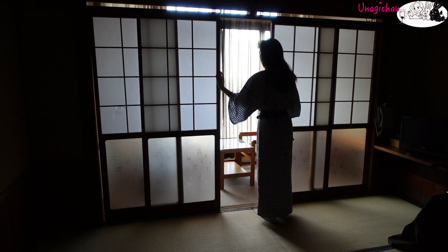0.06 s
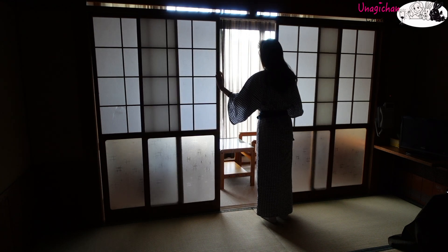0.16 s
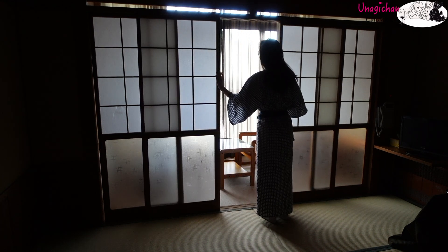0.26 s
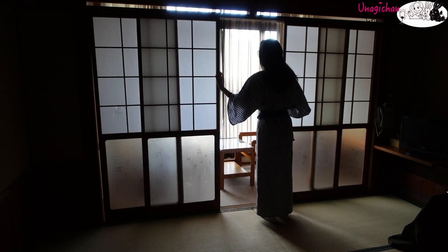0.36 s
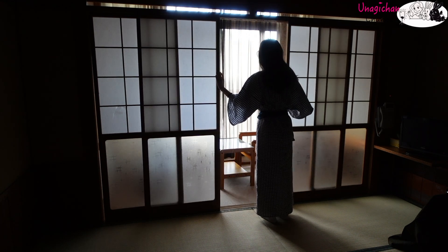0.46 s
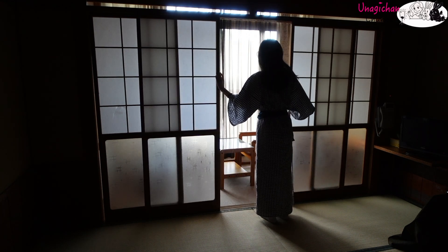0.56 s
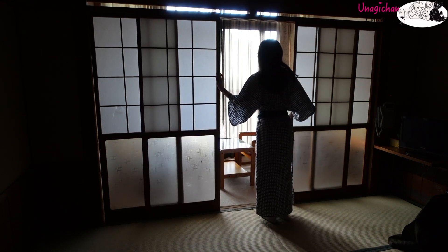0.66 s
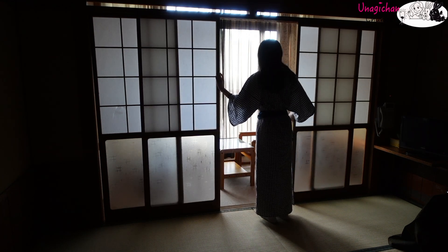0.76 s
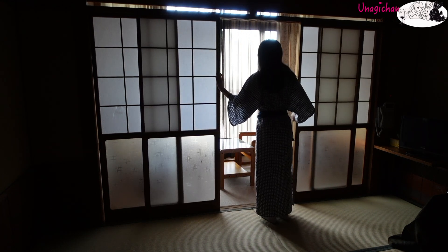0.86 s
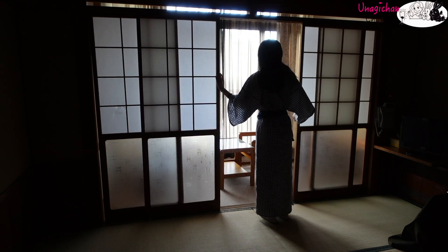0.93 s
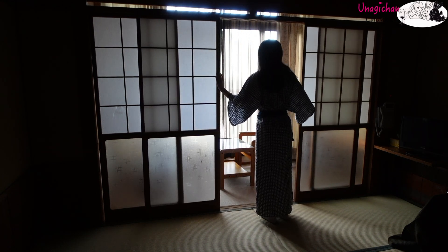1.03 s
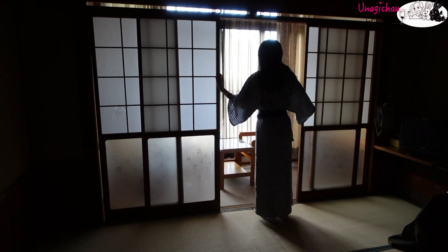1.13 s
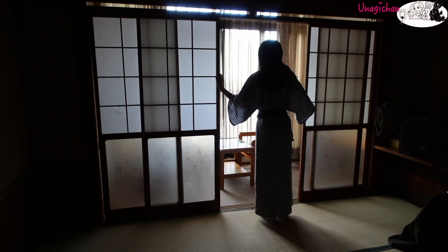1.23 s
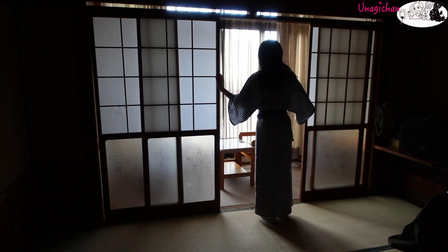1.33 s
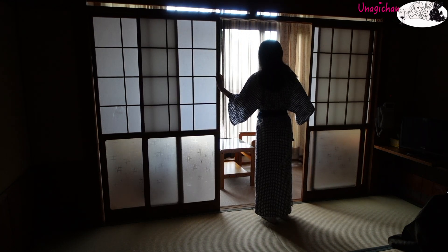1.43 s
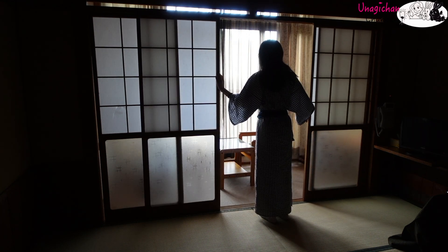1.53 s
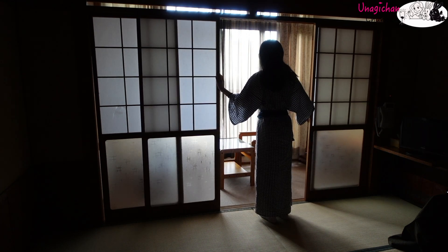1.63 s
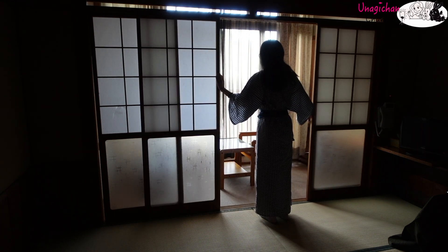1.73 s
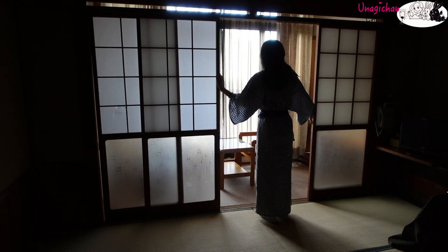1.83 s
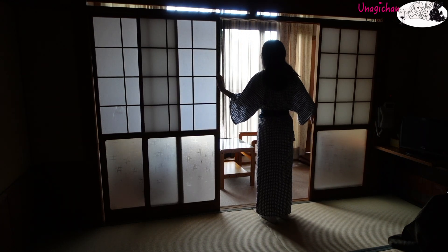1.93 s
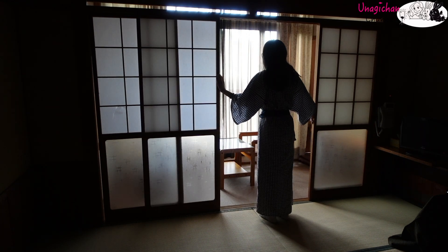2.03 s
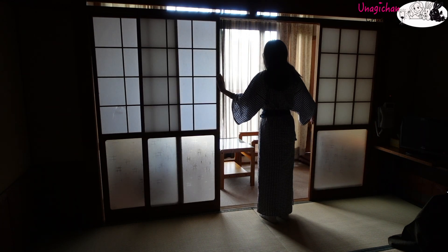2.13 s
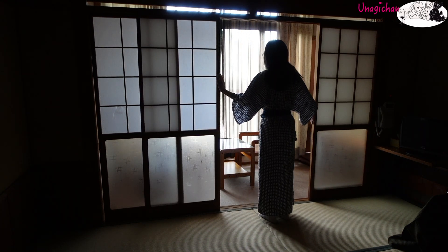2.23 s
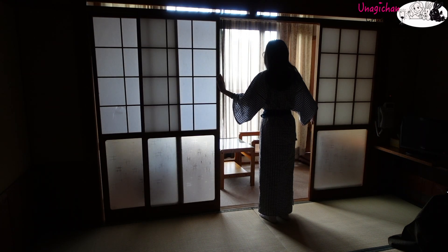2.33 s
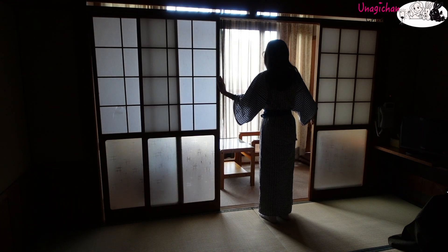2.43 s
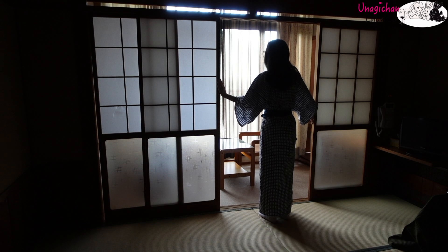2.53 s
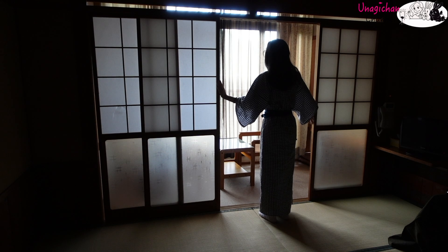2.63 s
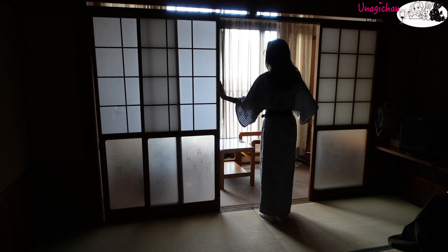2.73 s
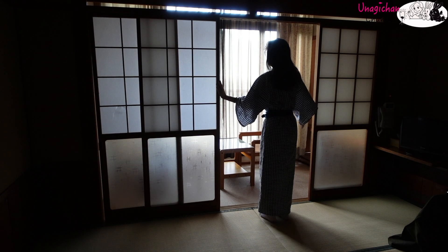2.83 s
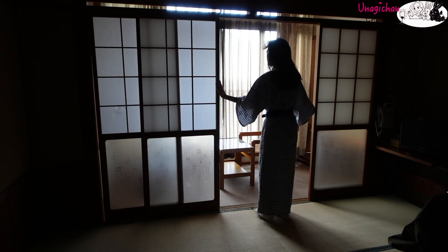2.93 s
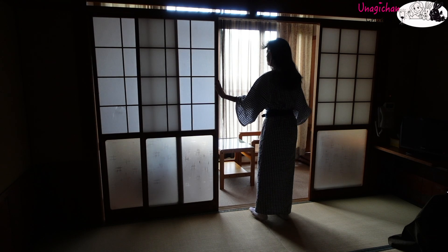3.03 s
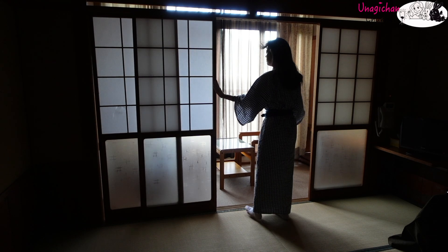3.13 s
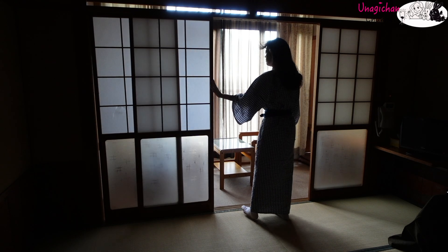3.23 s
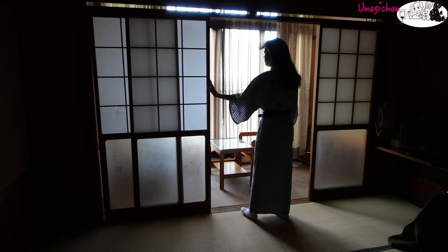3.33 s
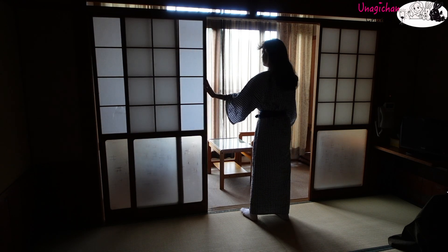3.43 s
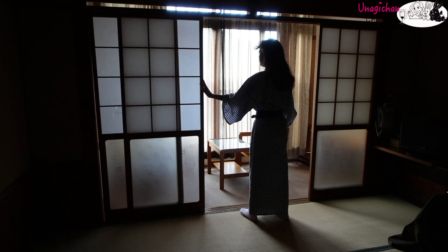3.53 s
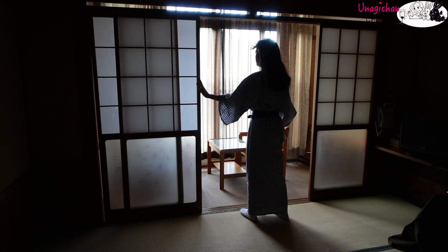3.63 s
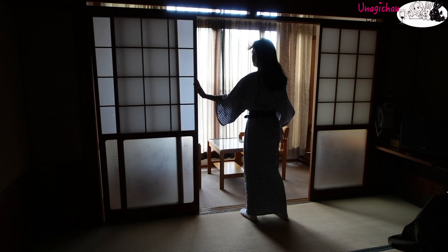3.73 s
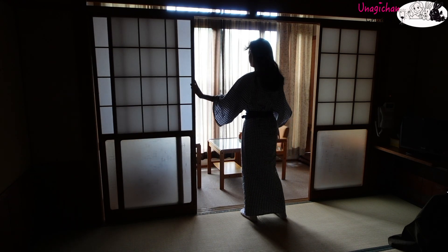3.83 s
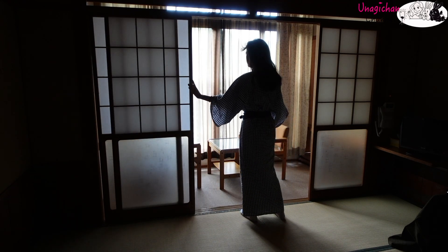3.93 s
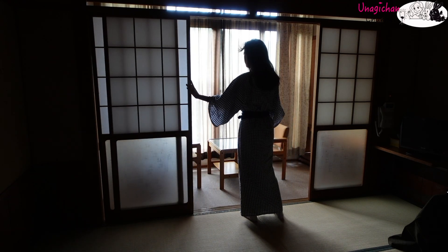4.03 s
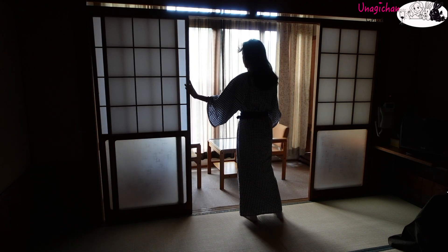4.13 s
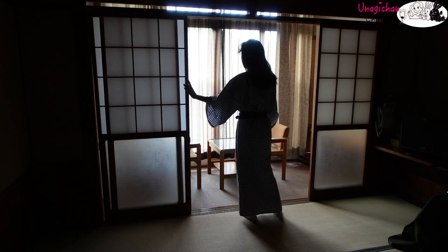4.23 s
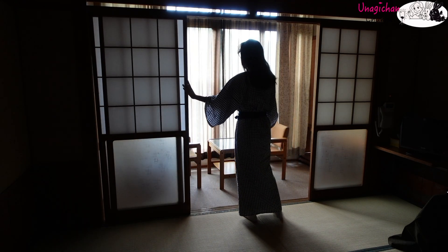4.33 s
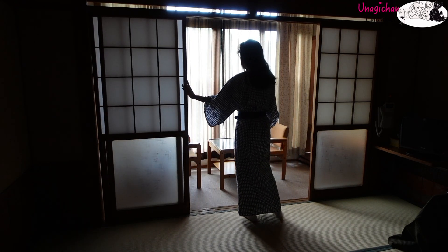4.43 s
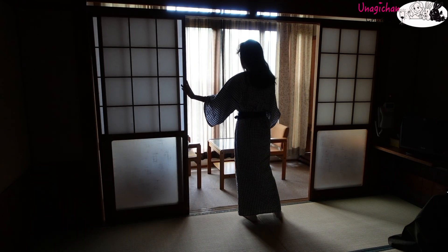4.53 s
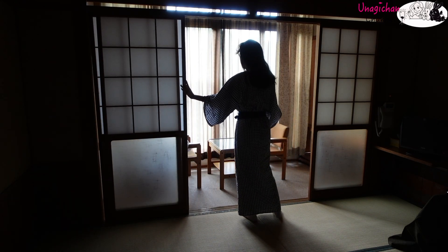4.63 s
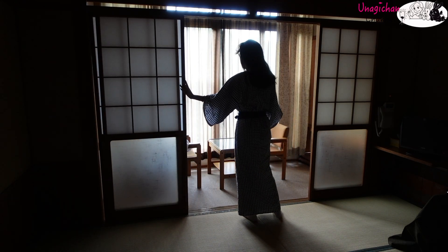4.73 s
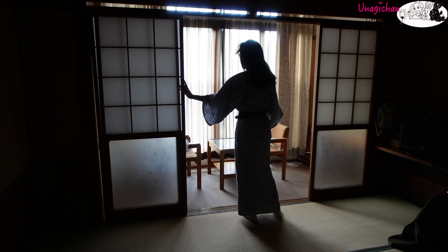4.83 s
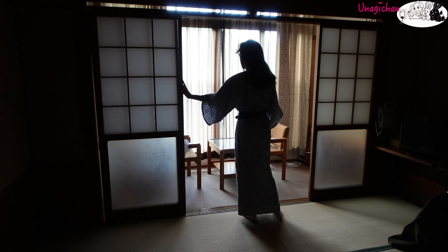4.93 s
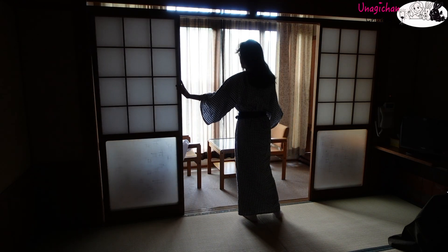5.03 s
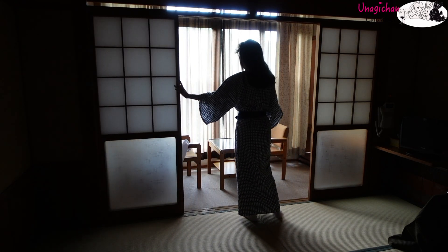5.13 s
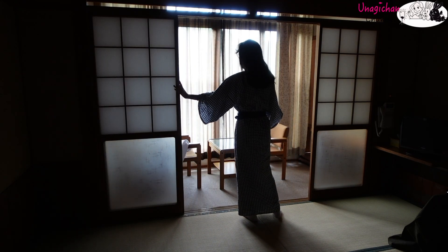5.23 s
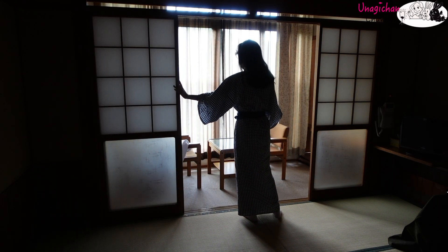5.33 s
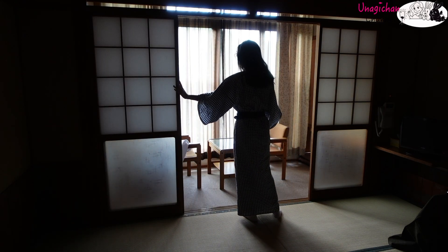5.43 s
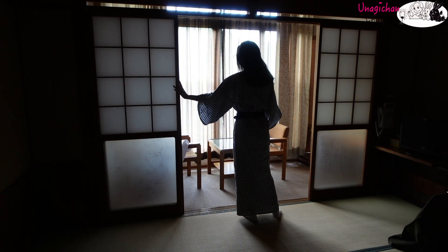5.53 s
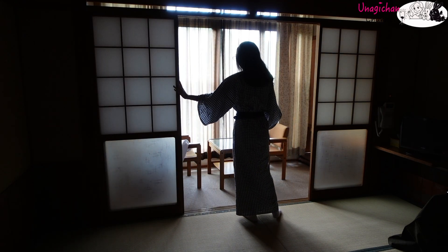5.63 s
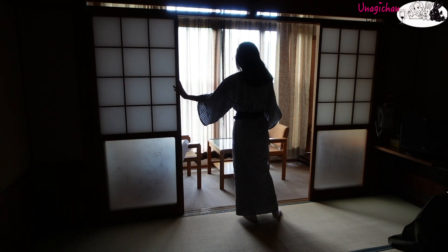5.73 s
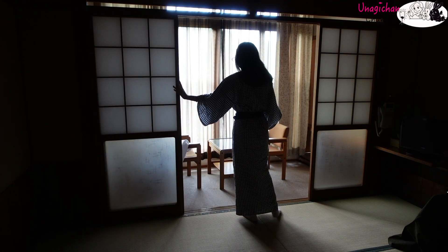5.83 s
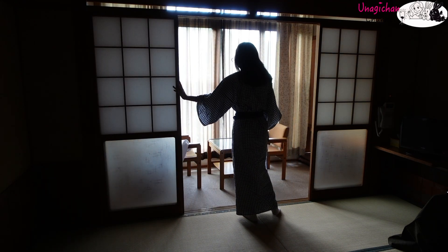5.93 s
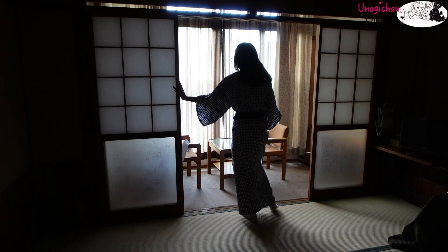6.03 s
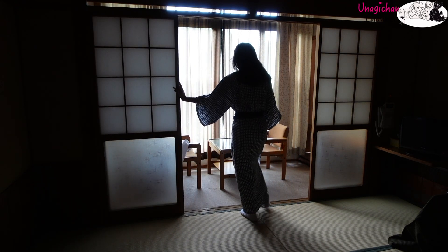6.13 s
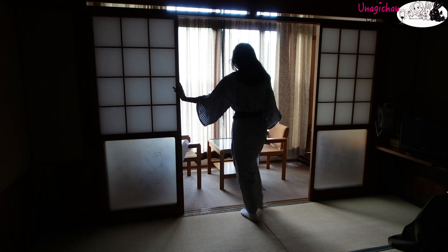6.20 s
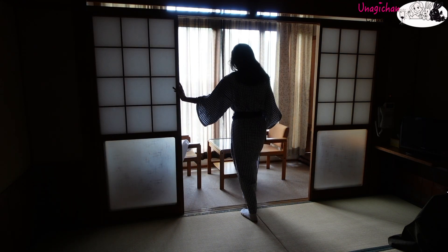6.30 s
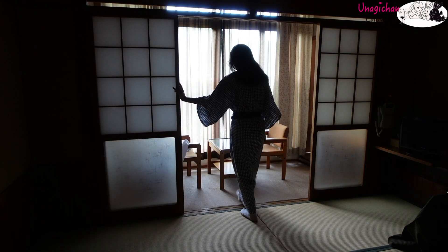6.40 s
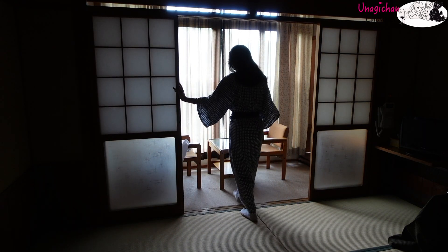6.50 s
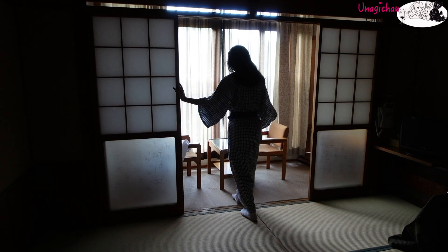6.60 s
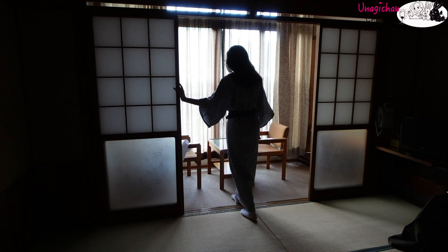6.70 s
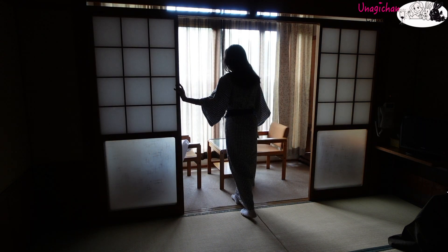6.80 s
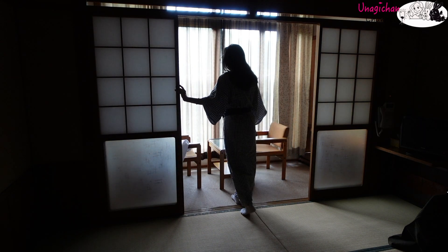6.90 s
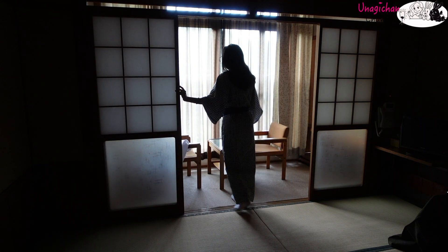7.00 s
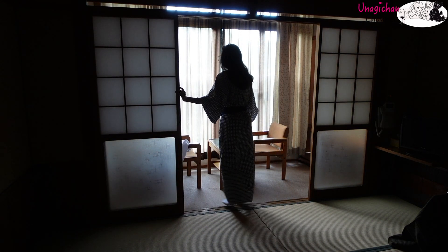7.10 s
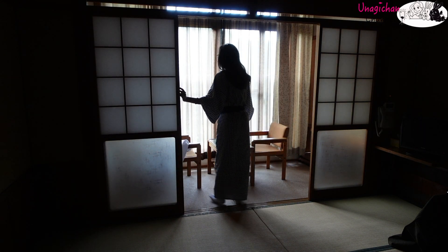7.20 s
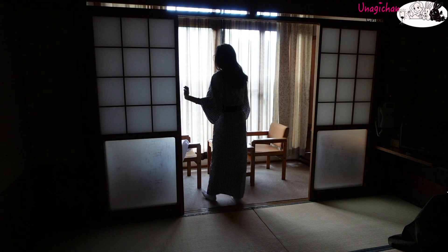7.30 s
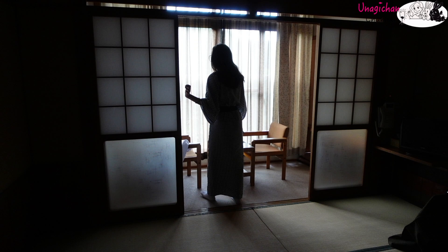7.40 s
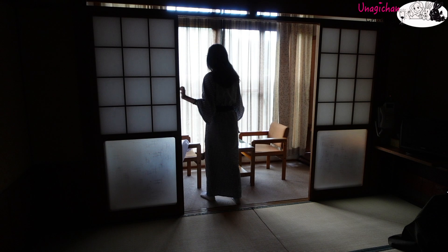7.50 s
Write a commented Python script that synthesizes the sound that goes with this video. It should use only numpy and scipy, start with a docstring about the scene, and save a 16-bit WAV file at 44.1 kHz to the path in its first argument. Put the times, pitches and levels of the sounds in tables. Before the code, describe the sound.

In a quiet matted room, a wooden lattice screen is already sliding, its panel rumbling strongly before settling into a drier scrape that surges late and ends in a sharp double knock. After a pause with a soft footfall and cloth rustle, a second screen scrapes open, thinly whistling, fades, is shoved again and knocks. Faint feet and brushing follow. The microphone stands a few metres away.

```python
"""Two sliding screens in a matted room

The microphone stands a few metres off as two wooden screens are pushed open one after the other.
Wood rubs in its groove in random stick-slip releases that ring the rails; coarser bumps rumble the panels.
The second runner whistles thinly, and each door knocks on its end stop: ringing modes plus a noisy rattle.
Soft thuds of feet, brushes of cloth and one blurred tick are shaped noise, over faint steady coloured noise."""
import sys
import numpy as np
from scipy import signal
from scipy.fft import rfft, irfft
from scipy.io import wavfile
from scipy.ndimage import uniform_filter1d, map_coordinates

SR = 44100
rng = np.random.default_rng(int(sys.argv[2]) if len(sys.argv) > 2 else 0)


def log_audio(samples):
    """Write samples as a 16-bit WAV file to the path given in sys.argv[1]."""
    # one column per channel
    frames = np.atleast_2d(samples).T
    # limit to full scale, then quantise
    limited = np.clip(frames, -1, 1)
    pcm = np.round(limited * 32767).astype(np.int16)
    wavfile.write(sys.argv[1], SR, pcm)


N = 333396  # samples
T = np.arange(N) / SR  # s
HZ = np.maximum(np.arange(N // 2 + 1) * SR / N, 1)  # spectrum bins, kept above zero for the log axis


def undb(db):
    """Decibels to gain."""
    return 10 ** (np.asarray(db) / 20)


def unit(x):
    """Scale to rms 1."""
    return x / np.sqrt(np.mean(x ** 2))


def read(points, hz):
    """Value of a table at a frequency, on a log axis."""
    f, value = np.transpose(points)
    return np.interp(np.log(hz), np.log(f), value)


def colour(x, points, peaks=()):
    """Filter by a smooth spectrum with resonances on top."""
    db = read(points, HZ)
    for f, width, lift in peaks:
        db = db + lift / (1 + (2 * (HZ - f) / width) ** 2)
    return irfft(rfft(x) * undb(db), N)


def band(x, hz, width):
    """A resonance applied twice, for steep skirts."""
    resonance = 1 / (1 + 1j * (HZ ** 2 - hz ** 2) / (HZ * width))
    return irfft(rfft(x) * resonance ** 2, N)


def walk(rate):
    """Random wander in straight ramps between normal draws, rate a second, with a spread near 1.4."""
    hold = max(int(SR / rate), 1)
    levels = np.repeat(rng.standard_normal(N // hold + 1), hold)
    return 1.76 * uniform_filter1d(levels, hold)[:N]


def waver(x, rate, share):
    """Let every frequency of a sound wander by a share of itself, by reading it early or late."""
    shift = np.cumsum(share * walk(rate))
    return map_coordinates(x, [np.arange(N) + shift], order=3, mode="mirror")


def gate(start, stop, attack, release):
    """Rise, hold until stop, fall."""
    rise = np.clip((T - start) / attack, 0, 1)
    fall = np.clip(1 - (T - stop) / release, 0, 1)
    return rise * fall


def pan(x, db):
    """Lean a sound to the left by db, or to the right if negative."""
    return x * undb(np.array([[db], [-db]]) / 2)


# Stereo width, sideways against middle sound: f/Hz, level/dB (before any gain on the side)
SIDE_LEVEL = [(30, -25), (125, -17), (250, -15.5), (500, -11), (3000, -9.5), (10000, -10.5)]


def stereo(mid, side):
    """Left and right from a middle signal and its weaker sideways reflections."""
    return mid + colour(side, SIDE_LEVEL) * np.array([[1], [-1]])


# Ring time of doors and room together: f/Hz, t60/s
RING_TIME = [(60, 1), (160, 0.98), (300, 0.7), (700, 0.46), (1400, 0.36), (2700, 0.27), (5000, 0.25),
             (14000, 0.4)]


def tail(count=SR):
    """A dense wash of reflections, flat in colour at first, each band dying at its own rate."""
    spectrum = rfft(rng.standard_normal(count))
    f = np.maximum(np.arange(count // 2 + 1) * SR / count, 1)
    centres, t60 = np.transpose(RING_TIME)
    # overlapping bands that add up to the whole spectrum
    shares = np.array([np.interp(np.log(f), np.log(centres), row) for row in np.eye(len(RING_TIME))])
    decay = np.exp(-np.log(1000) * T[:count] / t60[:, None])
    return np.sum(irfft(spectrum * shares, count) * decay, axis=0)


def room(x, direct=1.0):
    """Heard across the room: direct sound plus middle and sideways reflections, direct against wash."""
    mid, side = (signal.fftconvolve(x, h / np.linalg.norm(h))[:N] for h in (tail(), tail()))
    return stereo(direct * x + mid, side) / np.hypot(1, direct)


def travelling(x, start, stop, count=9, direct=0.87):
    """The pattern of reflections changes as the door moves from one place on its track to the next."""
    place = np.interp(T, [start, stop], [0, count - 1])
    reflections = 0
    for k in range(count):
        nearness = np.cos(np.pi / 2 * np.minimum(abs(place - k), 1))
        reflections = reflections + room(x * nearness, direct=0)
    return (direct * x + reflections) / np.hypot(1, direct)


def slips(rate, spread_db, judder_db, judder_hz):
    """Tiny stick-slip releases, rate a second, of very uneven size, swelling as the door judders."""
    hit = rng.random(N) < rate / SR
    size = undb(spread_db * np.minimum(rng.exponential(size=N), 4))
    sign = rng.choice([-1, 1], N)
    return hit * size * sign * undb(judder_db * walk(judder_hz))


# Steady background colour: f/Hz, relative level/dB per Hz
AIR_COLOUR = [(18, -60), (30, -37), (59, -19), (102, -4.5), (270, 2), (420, -2), (622, -5.5), (1550, -4),
              (1910, -6.5), (3490, -10), (15500, -18.5)]
# Resonances in the background: f/Hz, width/Hz, lift/dB
AIR_RESONANCES = [(620, 132, 10), (1150, 91, 4.5), (1895, 300, 4.5)]
AIR_DB = -64.5  # level of the middle signal


def background():
    """A faint airy drone of coloured noise that wavers a little in level, with fine hiss above it."""
    mid, side = (unit(colour(rng.standard_normal(N), AIR_COLOUR, AIR_RESONANCES)) for _ in range(2))
    level = undb(AIR_DB + 0.5 * walk(8.8))
    return level * stereo(mid, undb(6.5) * side)


# Cloth and soles brushing, and one soft, blurred tick at 6.6 s: t/s, level/dB, centre f/Hz, half length/s
SOFT_BURSTS = [(2.594, -70.5, 8000, 0.084), (2.972, -66, 8500, 0.17), (6.607, -65, 4200, 0.014),
               (6.973, -72.5, 5030, 0.18), (7.373, -59.5, 4630, 0.049)]


def soft_bursts():
    """Short bursts of band noise that swell and fade."""
    noise = rng.standard_normal(N)
    out = 0
    for s, db, hz, length in SOFT_BURSTS:
        swell = np.exp(-((T - s) / length) ** 2)
        out = out + undb(db) * swell * unit(band(noise, hz, hz))
    return room(out)


# Weight shifting on the matted floor: t/s, level/dB, thud f/Hz, length/s
FOOTFALLS = [(0.881, -56, 284, 0.18), (1.068, -61.5, 76, 0.15), (2.48, -55.5, 280, 0.087),
             (2.538, -65.5, 72.5, 0.053), (4.132, -60.5, 195, 0.055), (4.34, -65.5, 184, 0.08),
             (5.744, -65.5, 170, 0.03), (6.956, -62.5, 560, 0.03), (7.035, -68.5, 69.5, 0.065),
             (7.28, -56.5, 232, 0.13)]


def steps():
    """Soft thuds of band noise as the floor takes the weight."""
    out = 0
    for s, db, hz, length in FOOTFALLS:
        age = np.maximum(T - s, 0) / length
        press = np.minimum(age * 4, 1) * np.exp(-age ** 2)
        out = out + undb(db) * press * unit(band(rng.standard_normal(N), hz, 0.6 * hz))
    return room(out)


# Dry ticks of the frames: t/s, level/dB, centre f/Hz, width/Hz
FRAME_TICKS = [(2.001, -62, 8500, 7000), (2.007, -41.5, 3330, 3780), (2.011, -67, 11200, 9000),
               (5.732, -66, 4230, 700), (5.76, -65, 4330, 800), (5.815, -67, 4760, 700)]
TICK_ATTACK_S, TICK_S = 0.0012, 0.018


def ticks():
    """Hard edges click as the first door meets its post; later the frame ticks faintly under the resting hand."""
    slip = rng.standard_normal(N)
    out = 0
    for s, db, hz, width in FRAME_TICKS:
        # the fall begins at s, together with the rise
        click = gate(s, s, TICK_ATTACK_S, TICK_S)
        out = out + undb(db) * click * unit(band(slip, hz, width))
    return room(out)


# Tight stretches of groove where a door binds: start t/s, length/s, centre f/Hz, width/Hz, level/dB
TIGHT_GROOVE = [(0.381, 0.027, 5960, 3000, -50), (0.476, 0.032, 4180, 350, -51.5),
                (0.832, 0.064, 2800, 2520, -51.5), (1.646, 0.22, 5600, 2540, -55),
                (2.985, 0.19, 3380, 700, -63), (3.055, 0.31, 2920, 500, -58),
                (3.223, 0.064, 3220, 800, -53.5), (3.657, 0.23, 1397, 220, -55),
                (3.69, 0.21, 2940, 200, -54), (3.95, 0.14, 2950, 800, -59)]
RASP_ATTACK_S, RASP_RELEASE_S = 0.03, 0.17


def rasps():
    """Where the groove pinches, the slips crowd into one band for a moment."""
    friction = slips(rate=4200, spread_db=2.5, judder_db=1.3, judder_hz=40)
    out = 0
    for s, length, hz, width, db in TIGHT_GROOVE:
        pinch = gate(s, s + length, RASP_ATTACK_S, RASP_RELEASE_S)
        out = out + undb(db) * pinch * unit(band(friction, hz, width))
    return room(out)


# Modes of frame and panels: f/Hz, relative level/dB, t60/s
FRAME_MODES = [(72, -16, 1.1), (86, -14, 1.0), (153, 2, .95), (191, 3, .8), (236, 0, .75), (277, -2, .5),
               (296, 3, .5), (320, 4, .6), (399, -1, .5), (497, -1, .44), (539, -4, .42), (648, -3, .4),
               (1176, 0, .25), (1340, -3, .22), (1415, -2, .25), (1561, 0, .25), (1707, -1, .26),
               (1812, 5, .29), (1841, 2, .29), (1922, -3, .25), (2638, -3, .2), (3080, 0, .15)]
# Dense rattle of lattice and panes: f/Hz, relative level/dB
RATTLE_COLOUR = [(30, -23), (75, -6), (110, -16.5), (160, -3.5), (300, -4), (440, -6), (660, -3.5),
                 (950, -7.5), (1400, -3), (1900, -8), (2300, -10), (3000, -8), (4000, -11.5), (5300, -15.5),
                 (7000, -26), (15000, -38)]
# Clusters of close resonances in the lattice: f/Hz, width/Hz, lift/dB
LATTICE_CLUSTERS = [(310, 80, 4), (740, 140, 2.5), (1835, 130, 7)]
# Blows on the doors and the low rebounds after them: t/s, relative level/dB,
# contact softness as corner f/Hz, bass cut f/Hz, rise/s, direct crack gain
BLOWS = [(0.138, -32, 185, 80, 0.006, 2), (0.282, -33, 171, 90, 0.0048, 3),
         (2.002, -35.5, 1010, 650, 0.0021, 3.7), (2.012, -28, 373, 190, 0.0081, 7.4),
         (2.055, -30.5, 810, 750, 0.0044, 5.8), (2.06, -36, 220, 110, 0.006, 8),
         (3.489, -45, 503, 130, .004, 2), (3.699, -26.5, 12000, 9000, 0.0038, 5.5),
         (3.711, -48, 400, 130, 0.0039, 15), (5.251, -32, 11900, 3500, 0.00049, 4.3),
         (5.255, -22.5, 5970, 85, 0.0037, 2.7), (5.261, -13, 2500, 2380, 0.012, 2),
         (5.3, -25, 270, 190, 0.04, 0.3), (7.283, -41.5, 546, 110, 0.0094, 3.4),
         (7.335, -38.5, 196, 100, 0.027, 11)]


def knocks(count=SR):
    """Each blow rings the frame and rattles the lattice; soft contact is dull, a glancing tick has no bass."""
    t = T[:count]
    modes = 0
    for k, (hz, db, t60) in enumerate(FRAME_MODES):
        mode = np.sin(2 * np.pi * hz * t) * np.exp(-np.log(1000) * t / t60)
        modes = modes + (-1) ** k * undb(db) * mode
    out = np.zeros((3, N + count))  # frame ring, middle rattle, side rattle
    for s, db, soft_hz, cut_hz, rise, crack in BLOWS:
        direct = 1 + crack * np.exp(-t / 0.0018)  # the direct sound leads the reflections
        blow = np.array([modes, direct * tail(), tail()])
        blow = blow * (1 - np.exp(-t / rise))
        blow = signal.sosfilt(signal.butter(2, soft_hz, fs=SR, output="sos"), blow)
        blow = signal.sosfilt(signal.butter(1, cut_hz, "high", fs=SR, output="sos"), blow)
        start = int(s * SR)
        out[:, start:start + count] += undb(db) * blow
    ring, mid, side = out[:, :N]
    mid, side = (undb(9.5) * colour(x, RATTLE_COLOUR, LATTICE_CLUSTERS) for x in (mid, side))
    return stereo(undb(-18.5) * ring + mid, undb(-1.0) * side)


START_S, STOP_S = 0.02, 0.055  # a door takes up and loses its motion this quickly


def effort(push):
    """Strength of the rubbing; silent while the door is at rest."""
    s, db = np.transpose(push)
    moving = gate(s[0] - START_S, s[-1], START_S, STOP_S)
    return moving * undb(np.interp(T, s, db))


def follow(rub, power):
    """A layer that grows faster (power over 1) or slower than the rubbing and meets it at its peak."""
    return rub.max() * (rub / rub.max()) ** power


# wood grain under a runner: changes a second, swing of each resonance and share of pitch per unit of walk
GRAIN_PER_S, GRAIN_DB, GRAIN_BEND = 14, 0.6, 0.004


def grain(friction, wood, rail):
    """Changing wood grain under the runner favours now one rail resonance, now another, and bends their pitch."""
    body = unit(colour(friction, wood, rail))
    swells = 0
    for f, width, _ in rail:
        around = [(f - 2 * width, -60), (f - width / 2, 0), (f + width / 2, 0), (f + 2 * width, -60)]
        change = undb(GRAIN_DB * walk(GRAIN_PER_S)) - 1
        swells = swells + change * colour(body, around)
    return unit(waver(body + swells, GRAIN_PER_S, GRAIN_BEND))


# Colour of grit at the rail's edge: f/Hz, relative level/dB
GRIT_COLOUR = [(2500, -27), (4300, 3.5), (5600, 6.5), (6600, -1), (8000, 0), (9600, -0.5), (11500, -8.5),
               (15500, -15)]
# Colour of the shaken panel: f/Hz, relative level/dB
RUMBLE_COLOUR = [(30, -32), (73, -11), (105, -24), (150, 2.5), (210, 0.5), (300, -4), (450, -4),
                 (700, -0.5), (1100, -3), (1600, -20.5), (5000, -61)]


def slide(rub, grit, shake, wood, rail, rub_db, grit_db, shake_db):
    """Slips ring the rail and crackle at its edge; coarser bumps of the groove shake the panel."""
    friction = slips(rate=4800, spread_db=2.6, judder_db=0.9, judder_hz=90)
    bumps = slips(rate=400, spread_db=1.5, judder_db=1.5, judder_hz=11)
    panel = [(f, 12, 5) for f, _, _ in FRAME_MODES if f < 700]  # width 12 Hz, lift 5 dB
    rubbing = undb(rub_db) * rub * grain(friction, wood, rail)
    crackle = undb(grit_db) * grit * unit(colour(friction, GRIT_COLOUR))
    rumble = undb(shake_db) * shake * unit(colour(bumps, RUMBLE_COLOUR, panel))
    return rubbing + crackle + rumble


# Colour of the second door's rubbing wood: f/Hz, relative level/dB
LEFT_WOOD_COLOUR = [(300, -44), (640, -17.5), (900, -14), (1300, -9), (1850, -0.5), (2300, -5.5),
                    (3000, 1.5), (3800, -3), (4600, -8), (6200, -34), (12000, -32)]
# Resonances of its rail: f/Hz, width/Hz, lift/dB
LEFT_RAIL_MODES = [(1154, 150, 7.2), (1460, 220, 4), (1800, 180, 1), (2937, 98, 2), (3290, 33, 1.2),
                   (4380, 66, 1.9)]
# How hard it rubs through its two shoves: t/s, relative level/dB
LEFT_EFFORT = [(2.9, -67.5), (3.07, -57.5), (3.31, -47.5), (3.58, -48.5), (3.76, -46.5), (4.31, -58),
               (4.68, -63), (5.1, -51), (5.24, -58.5)]
# Its dry runner catches and whistles: start t/s, length/s, level/dB
RUNNER_WHISTLES = [(2.93, 0.23, -64.5), (3.237, 0.096, -50), (3.981, 1.3, -63), (4.23, 0.22, -71),
                   (4.657, 0.41, -66.5), (4.85, 0.17, -61)]
WHISTLE_ATTACK_S, WHISTLE_RELEASE_S = 0.016, 0.055
WHISTLE_WAVER_PER_S, WHISTLE_BEND = 25, 0.003  # changes a second, share of pitch per unit of walk


def left_door():
    """The second screen scrapes too, and its dry runner whistles in one narrow, wavering resonance."""
    rub = effort(LEFT_EFFORT)
    scrape = slide(rub, follow(rub, power=1.01), follow(rub, power=1.0), LEFT_WOOD_COLOUR, LEFT_RAIL_MODES,
                   rub_db=1.26, grit_db=-9.5, shake_db=-16.0)
    # a negative spread makes the uneven slips weaker instead of stronger
    slipping = slips(rate=3100, spread_db=-2.5, judder_db=1.1, judder_hz=40.4)
    runner = waver(unit(band(slipping, hz=5070, width=400)), WHISTLE_WAVER_PER_S, WHISTLE_BEND)
    whistle = 0
    for s, length, db in RUNNER_WHISTLES:
        whistle = whistle + undb(db) * gate(s, s + length, WHISTLE_ATTACK_S, WHISTLE_RELEASE_S)
    return travelling(scrape + whistle * runner, 2.984, 5.345)


# Colour of the first door's rubbing wood: f/Hz, relative level/dB
RIGHT_WOOD_COLOUR = [(300, -33), (640, -4), (900, -14.5), (1300, -5.5), (1900, -4.5), (2400, -2.5),
                     (3000, 4.5), (4000, -4), (4800, -9), (6500, -19.5), (12000, -46)]
# Resonances of its rail: f/Hz, width/Hz, lift/dB
RIGHT_RAIL_MODES = [(1634, 100, 7), (1962, 180, 8), (3090, 230, 0.5), (3430, 77, -8), (3850, 300, 4)]
# How hard it rubs as it is pushed: t/s, relative level/dB
RIGHT_EFFORT = [(0.0, -40.5), (0.15, -41), (0.33, -42), (0.5, -42.5), (0.6, -44), (0.9, -44.5),
                (0.96, -47.5), (1.15, -49.5), (1.62, -48.5), (1.67, -46.5), (1.712, -41), (1.8, -46),
                (1.92, -48.5), (1.975, -51.5)]
EARLY_SHAKE_S, EARLY_SHAKE_DB = 0.34, 4.5  # the panel shakes harder early in the slide
SETTLE_DB_PER_S = 4.5  # and its shaking settles as it travels


def right_door():
    """Already sliding, its panel shaking hardest at first, the rumble dying down; the rubbing surges late."""
    rub = effort(RIGHT_EFFORT)
    early_db = EARLY_SHAKE_DB * gate(0, EARLY_SHAKE_S, START_S, STOP_S)
    shake = rub * undb(early_db - SETTLE_DB_PER_S * T)
    scrape = slide(rub, follow(rub, power=1.36), shake, RIGHT_WOOD_COLOUR, RIGHT_RAIL_MODES,
                   rub_db=1.0, grit_db=-10.0, shake_db=-12.0)
    return travelling(scrape, 0, 2.016)


def scene():
    """Doors, feet and cloth in the quiet room."""
    quiet = pan(background(), db=-1.3) + soft_bursts() + ticks()
    contacts = pan(steps() + rasps() + knocks(), db=-0.5)
    doors = pan(left_door(), db=0.0) + pan(right_door(), db=-1.0)
    return quiet + contacts + doors


TOP_HZ = 15800


def record(dry):
    """The recorder behind the microphone steeply cuts off the top."""
    return signal.sosfilt(signal.ellip(10, 0.2, 70, TOP_HZ, fs=SR, output="sos"), dry)


dry = scene()
out = record(dry)
log_audio(out)
```